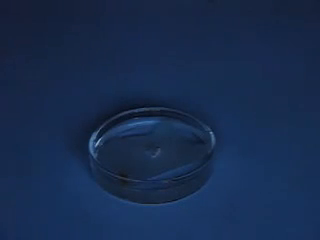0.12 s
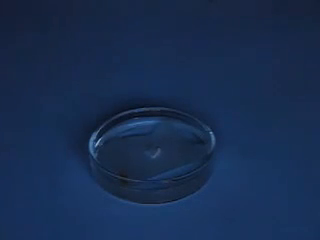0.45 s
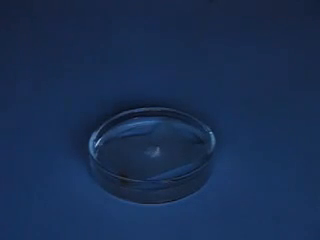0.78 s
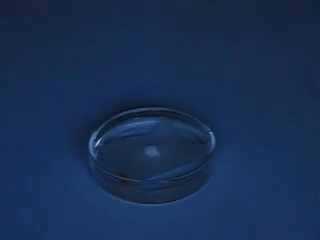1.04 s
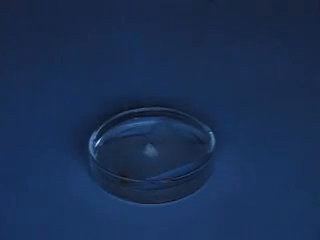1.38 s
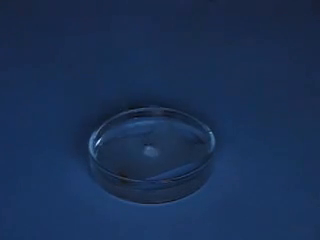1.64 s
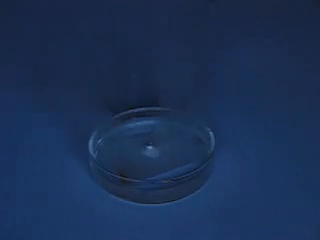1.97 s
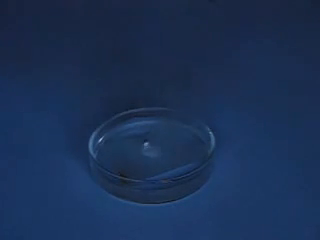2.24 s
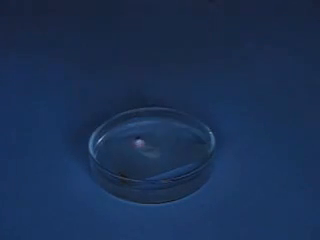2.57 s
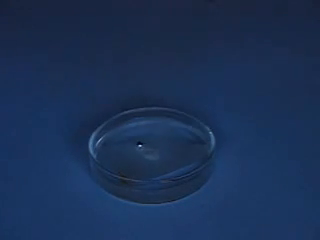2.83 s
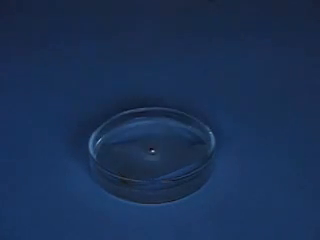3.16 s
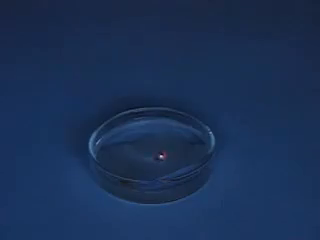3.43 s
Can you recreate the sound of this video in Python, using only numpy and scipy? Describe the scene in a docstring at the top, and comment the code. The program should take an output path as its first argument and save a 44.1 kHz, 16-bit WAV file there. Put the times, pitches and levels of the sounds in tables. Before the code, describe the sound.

A reacting metal lump sizzles in a water dish, surging and sinking above humming ventilation fans

```python
"""A hiss swells, sinks and returns over the rush and beating drones of two ventilation fans.
A lump of sodium skates on water in a glass dish, indoors, and catches fire as the hiss returns.
The hiss is thousands of tiny hydrogen bursts a second: random clicks, coloured, then rung in dish and room.
A narrow band of noise sizzles with it. The fans are gliding sines; motor whine, duct rush, two duct
resonances and room air lie beneath."""
import sys
import numpy as np
from scipy import signal
from scipy.fft import rfft, irfft
from scipy.io import wavfile

SR = 44100
rng = np.random.default_rng(int(sys.argv[2]) if len(sys.argv) > 2 else 0)


def master(y):
    """Save y as 16-bit WAV."""
    cut = np.clip(np.atleast_2d(y).T, -1, 1)
    pcm = np.round(cut * 32767)  # scale
    wavfile.write(sys.argv[1], SR, pcm.astype(np.int16))


N = 159201


def undb(db):
    """Decibels to amplitude gain."""
    return 10 ** (np.asarray(db) / 20)


def unit(x):
    """Scale to rms 1."""
    return x / np.sqrt(np.mean(x ** 2))


def noise():
    """White noise for the whole scene."""
    return rng.standard_normal(N)


def curve(table, column=1):
    """One column of a time table, interpolated to every sample."""
    rows = np.array(table, float)
    return np.interp(np.arange(N) / SR, rows[:, 0], rows[:, column])


def walk(rate_hz):
    """Smooth random curve of rms 1: noise under a Gaussian low-pass at rate_hz."""
    f_hz = np.arange(N + 1) * SR / (2 * N)
    spectrum = rfft(rng.standard_normal(2 * N)) * np.exp(-(f_hz / rate_hz) ** 2)
    return unit(irfft(spectrum)[:N])


def ring(x, response):
    """Convolve with an impulse response; the end of x leads in, so the sound is already running."""
    size = len(response)
    running = np.concatenate([x[-size:], x])
    return signal.fftconvolve(running, response)[size:size + N]


def colour(x, points):
    """Minimum-phase filter through (Hz, dB) points, joined on a log frequency axis."""
    size = 16384
    hz, db = np.array(points, float).T
    f_hz = np.maximum(np.arange(size // 2 + 1) * SR / size, 1)
    gain = undb(np.interp(np.log(f_hz), np.log(hz), db))
    # Folding the cepstrum makes the response causal
    cepstrum = irfft(np.log(gain))
    cepstrum[1:size // 2] *= 2
    cepstrum[size // 2 + 1:] = 0
    return ring(x, irfft(np.exp(rfft(cepstrum))))


def mode(hz, width_hz):
    """Decaying cosine of one resonance; the width factor equalises gain at the centres."""
    t_s = np.arange(SR // 10) / SR
    return width_hz * np.exp(-np.pi * width_hz * t_s) * np.cos(2 * np.pi * hz * t_s)


def resonant_noise(source, hz, width_hz):
    """Noise passed twice through one resonance, at rms 1."""
    note = mode(hz, width_hz)
    return unit(ring(ring(source, note), note))


def tone(hz, db):
    """A sine that follows a pitch and an rms level."""
    phase = 2 * np.pi * np.cumsum(hz) / SR
    return np.sqrt(2) * undb(db) * np.sin(phase)


def gas_bursts():
    """Sparse random clicks of either sign and varied size, their level sputtering: hydrogen bursts."""
    bursts_per_s, size_spread_db = 3400, 3.5
    sputter_db, sputter_hz = 0.75, 40
    happens = rng.random(N) < bursts_per_s / SR
    size_db = size_spread_db * np.clip(noise(), -2, 2)
    sign = np.sign(noise())
    return happens * undb(size_db) * sign * undb(sputter_db * walk(sputter_hz))


def dish_gain():
    """The glass dish adds a resonant power peak at each mode; returns (Hz, dB) points."""
    # dish resonances: (centre [Hz], width [Hz], relative peak level [dB])
    dish_modes = [(2160, 30, -8), (2347, 16, -4), (2643, 24, -7), (2848, 15, -1), (2912, 16, -2),
                  (3036, 24, 0), (3090, 15, -1), (3262, 22, -1), (3424, 18, -2), (3494, 16, 1),
                  (3688, 20, -1.5), (3795, 20, -3), (3892, 36, 2), (4064, 20, -1), (4134, 20, 1),
                  (4312, 20, -2), (4554, 22, -3), (4969, 20, 0), (5163, 26, -1), (5862, 26, -2)]
    peaks_db = 8  # lifts all peaks over the direct sound
    f_hz = np.arange(1, SR // 2, 2.)
    power = 0
    for hz, width_hz, db in dish_modes:
        detune = 2 * (f_hz - hz) / width_hz
        power = power + undb(db + peaks_db) ** 2 / (1 + detune ** 2)
    return np.column_stack([f_hz, 10 * np.log10(1 + power)])


def add_room(direct):
    """Add the room's reverberation: convolution with exponentially decaying noise."""
    room_db, t60_s = -8.5, .22
    t_s = np.arange(SR // 2) / SR
    decay = np.exp(-np.log(1000) * t_s / t60_s)
    room = unit(ring(direct, rng.standard_normal(len(t_s)) * decay))
    return unit(direct + undb(room_db) * room)


def tilt_brightness(hiss):
    """Trade the hiss below the split frequency against the hiss above it, over time."""
    # brightness of the hiss: (time [s], gain above the split and cut below it [dB])
    brightness = [(0, -0.5), (1.5, 4), (1.75, -1), (2.25, -1), (2.45, 0.5), (2.62, 1), (2.75, 0.7),
                  (3.2, 0), (3.5, -1.5)]
    split_hz = 3940
    low_pass = signal.butter(2, split_hz, fs=SR, output="sos")
    body = signal.sosfiltfilt(low_pass, hiss)
    tilt = undb(curve(brightness))
    return body / tilt + (hiss - body) * tilt


def fizz():
    """Gas bursts merge into a hiss in dish and room; reaction strength sets its level."""
    # colour of the bursts: (frequency [Hz], relative level [dB])
    burst_colour = [(200, -4.5), (370, 6.5), (900, 2), (1500, -1.5), (2000, -1.5), (2600, -1), (3000, 2),
                    (4000, 0.1), (4700, -1.5), (5300, -3), (5900, -7.5), (6600, -20), (7300, -36)]
    # strength of the reaction: (time [s], hiss level before the brightness tilt [dB])
    reaction = [(0, -55.5), (.48, -55.5), (.505, -49), (.56, -55.5), (1.1, -54.5), (1.36, -48), (1.56, -48),
                (1.65, -44.5), (1.76, -40), (1.88, -42.5), (1.98, -40), (2.09, -40.7), (2.23, -38),
                (2.31, -39.5), (2.39, -37.5), (2.44, -38), (2.57, -35.5), (2.62, -32.5), (2.67, -37.5),
                (2.78, -44.5), (2.83, -54.5), (3.02, -48), (3.25, -41), (3.31, -44.7), (3.45, -44.5),
                (3.5, -42), (3.56, -56.5), (3.61, -67)]
    direct = unit(colour(colour(gas_bursts(), burst_colour), dish_gain()))
    hiss = add_room(direct)
    return undb(curve(reaction)) * tilt_brightness(hiss)


def sizzle():
    """Gas escaping under the lump sings in one narrow band: doubly resonated noise."""
    # sizzling note of the lump: (time [s], level [dB])
    sizzle_level = [(0, -62), (1.1, -59.5), (1.25, -50.5), (1.34, -54.5), (1.39, -46.5), (1.45, -56.5),
                    (1.7, -52.5), (2.21, -52.5), (2.46, -53), (2.6, -49), (2.83, -67), (3.25, -52.5),
                    (3.49, -56), (3.6, -69)]
    note_hz, pass_width_hz = 3900, 190
    return resonant_noise(noise(), note_hz, pass_width_hz) * undb(curve(sizzle_level))


def drone(fan, overtones_db, wander):
    """One fan's harmonics on a gliding pitch, each wavering in level on its own."""
    waver_db, waver_hz = 1.56, 2.8
    hz = curve(fan) * wander
    total = 0
    for harmonic, db in enumerate(overtones_db, start=1):
        level_db = curve(fan, column=2) + db + waver_db * walk(waver_hz)
        total = total + tone(harmonic * hz, level_db)
    return total


def fan_drones():
    """Two fans beat at the difference of their pitches, fastest at the end as their speeds part."""
    # fan that ends slower: (time [s], pitch before wander [Hz], level before waver [dB])
    slowing_fan = [(0, 58.45, -26), (.4, 59.86, -25.5), (.9, 59.34, -30), (1.3, 58.92, -28.5),
                   (1.7, 58.34, -27.5), (2.1, 58.9, -28.5), (2.5, 58.06, -27.5), (2.9, 57.42, -23.5),
                   (3.6, 55.68, -27)]
    # fan that ends faster: (time [s], pitch before wander [Hz], level before overtones and waver [dB])
    rising_fan = [(0, 65.33, -35.5), (.4, 64.48, -26.5), (.9, 64.23, -28.5), (1.3, 64.05, -33),
                  (1.7, 64.95, -27.5), (2.1, 64.87, -33.5), (2.5, 65.82, -32), (2.9, 67.08, -30),
                  (3.6, 68.2, -34)]
    # first three harmonics of the rising fan: level offset [dB]
    rising_overtones = [-2.5, -12.5, -16]
    speed_spread, wander_hz = 0.003, 4.0
    wander = 1 + speed_spread * walk(wander_hz)  # shared by both fans
    return drone(slowing_fan, [0], wander) + drone(rising_fan, rising_overtones, wander)


def motor_whine():
    """The fan motors hum and whine: sines wavering in pitch and level."""
    # motor tones: (mean pitch [Hz], pitch waver rms [Hz], level before waver [dB])
    motor_tones = [(192.4, 4.95, -48), (242.3, 3.5, -49), (296.5, 6, -56.5), (1824, 2.6, -62.5)]
    level_waver_db = 2.5
    total = 0
    for hz, waver_hz, db in motor_tones:
        total = total + tone(hz + waver_hz * walk(12), db + level_waver_db * walk(11.0))
    return total


def duct_rush():
    """Air rushes in the fan duct: coloured noise with a slightly wavering level."""
    # colour of the rush: (frequency [Hz], relative level [dB])
    rush_colour = [(250, -29), (420, -2.5), (520, 1), (750, 1), (1080, 1), (1300, -10.5), (1800, -26),
                   (3000, -59)]
    # strength of the rush: (time [s], level before waver [dB])
    rush_level = [(0, -45), (1.0, -45), (1.5, -44), (1.7, -45.5), (2.1, -46), (2.6, -42.5), (2.9, -42),
                  (3.15, -42), (3.6, -40)]
    waver_db, waver_hz = .5, 8.7
    level_db = curve(rush_level) + waver_db * walk(waver_hz)
    return unit(colour(noise(), rush_colour)) * undb(level_db)


def duct_notes():
    """The draught, one shared noise, sounds two close resonances of the duct that swell and sink."""
    # duct resonances: (centre [Hz], width per pass [Hz], relative level [dB])
    resonances = [(677, 16, 0), (735.4, 16, 0)]
    # both resonances together: (time [s], level [dB])
    notes_level = [(0, -48.5), (.4, -52), (1.0, -61), (1.54, -62), (1.61, -47), (1.7, -46), (1.87, -65),
                   (2.6, -61), (2.95, -48.5), (3.2, -55), (3.6, -51)]
    draught = noise()
    notes = 0
    for hz, width_hz, db in resonances:
        notes = notes + undb(db) * resonant_noise(draught, hz, width_hz)
    return unit(notes) * undb(curve(notes_level))


def room_air():
    """Steady air and rumble of the room: coloured noise at a constant level."""
    # colour of the air: (frequency [Hz], relative level [dB])
    air_colour = [(10, -24.5), (20, -1), (29, 4), (36, 1), (44, 2.5), (52, -11.5), (75, -8), (110, -16),
                  (150, -13.5), (200, -15.5), (260, -18.5), (330, -24.5), (400, -30.5), (700, -29.5),
                  (1100, -30.5), (1400, -34), (2200, -38), (3500, -41), (4800, -42), (5600, -47.5),
                  (6300, -57.5), (7200, -79)]
    level_db = -29.5
    return unit(colour(noise(), air_colour)) * undb(level_db)


def scene():
    """Sum the reaction, the fans and the air into one channel."""
    reaction = fizz() + sizzle()
    fans = fan_drones() + motor_whine() + duct_rush() + duct_notes()
    return (reaction + fans + room_air())[None]


def record(dry):
    """The recorder cuts the top steeply: an elliptic low-pass."""
    top_hz, ripple_db, stop_db = 7200, .2, 70
    low_pass = signal.ellip(8, ripple_db, stop_db, top_hz, fs=SR, output="sos")
    return signal.sosfilt(low_pass, dry)


dry = scene()
out = record(dry)
master(out)
```